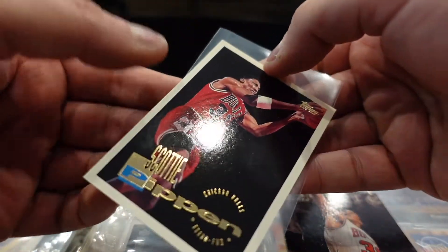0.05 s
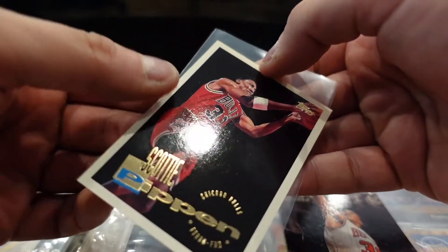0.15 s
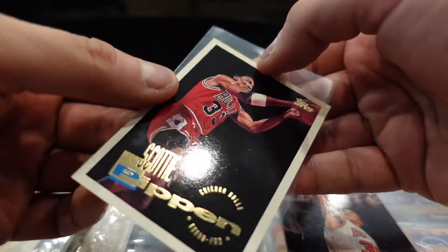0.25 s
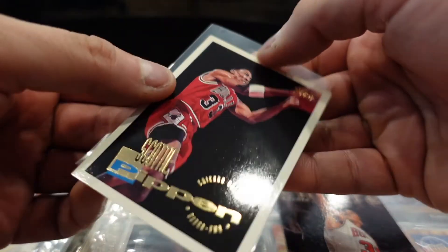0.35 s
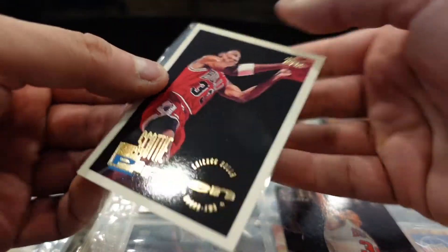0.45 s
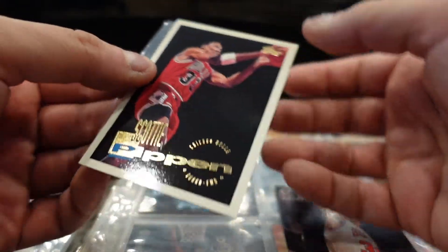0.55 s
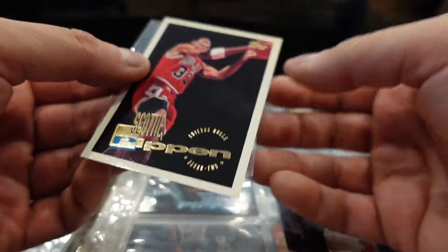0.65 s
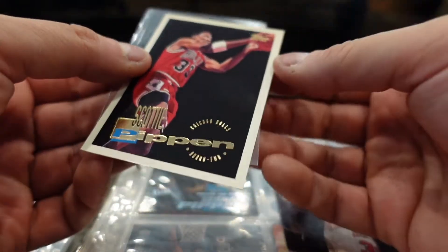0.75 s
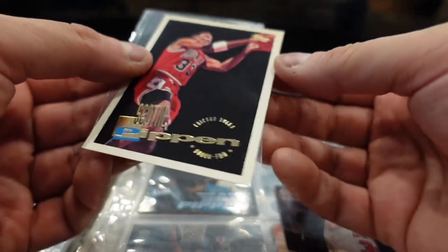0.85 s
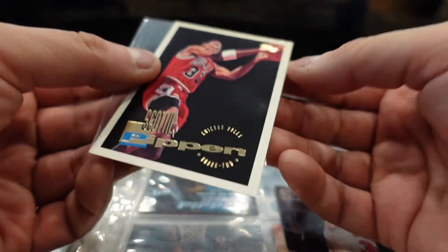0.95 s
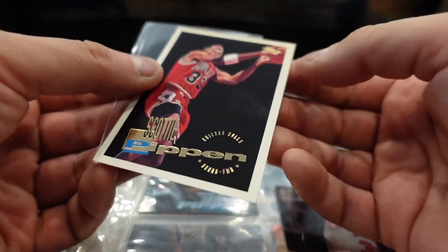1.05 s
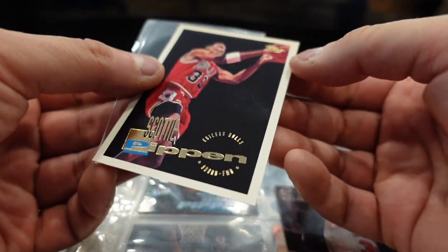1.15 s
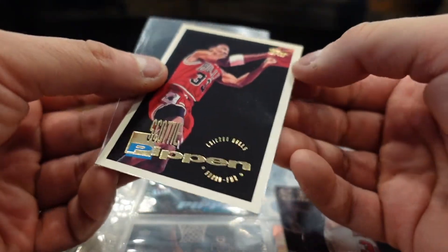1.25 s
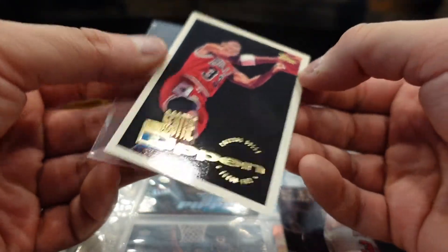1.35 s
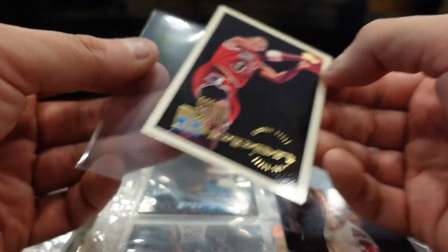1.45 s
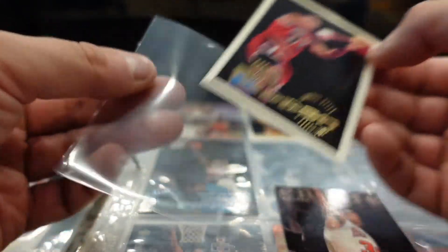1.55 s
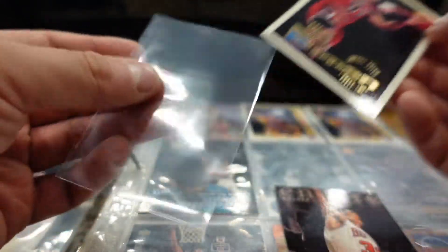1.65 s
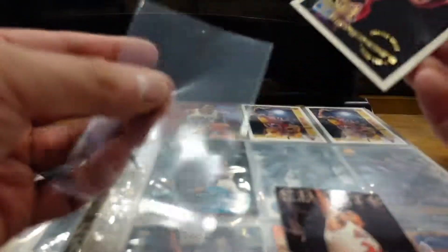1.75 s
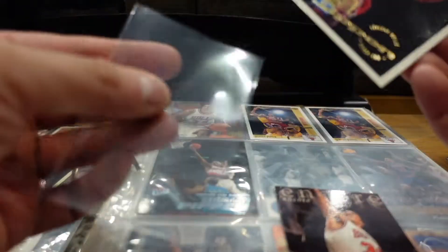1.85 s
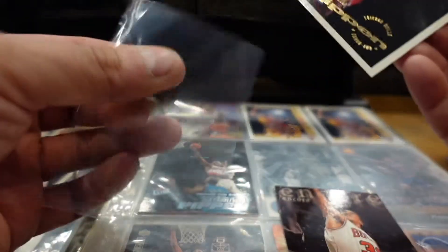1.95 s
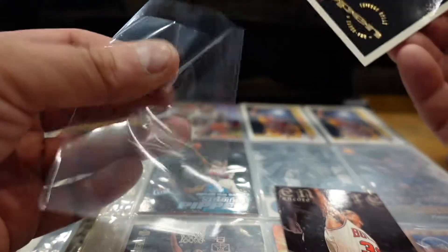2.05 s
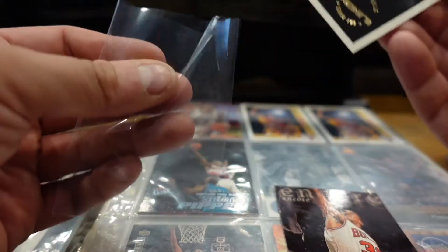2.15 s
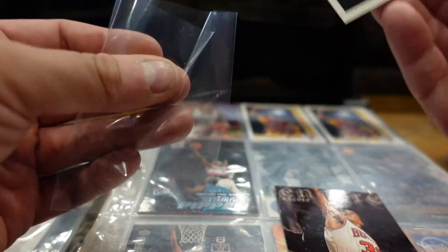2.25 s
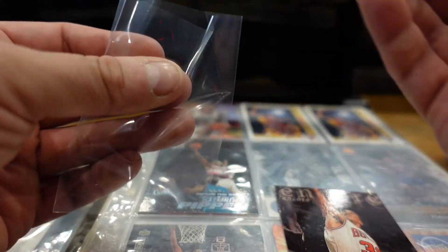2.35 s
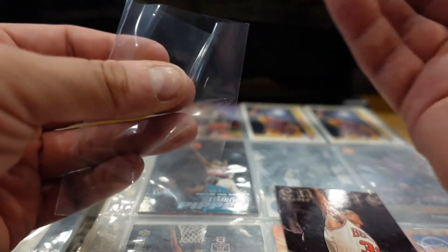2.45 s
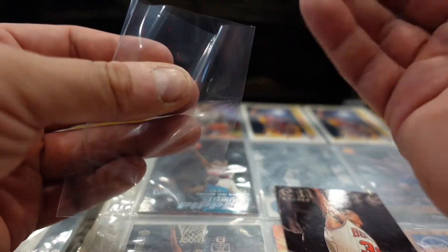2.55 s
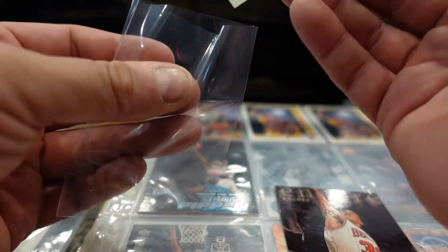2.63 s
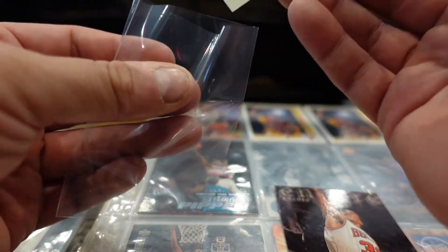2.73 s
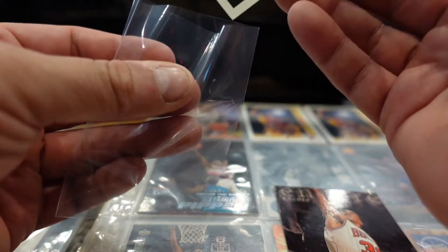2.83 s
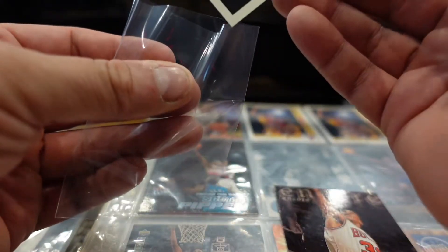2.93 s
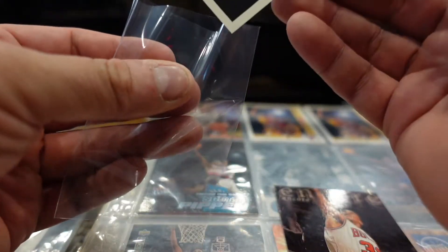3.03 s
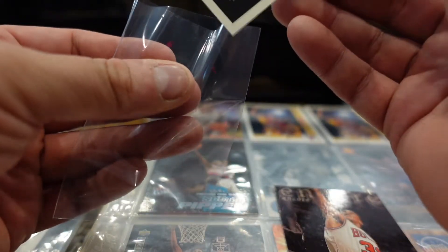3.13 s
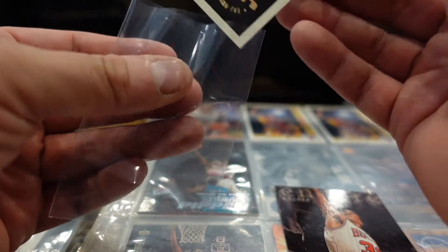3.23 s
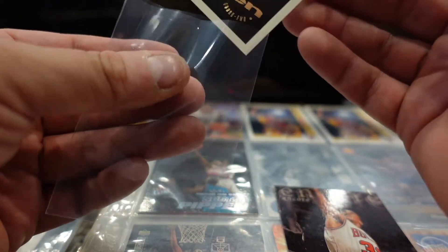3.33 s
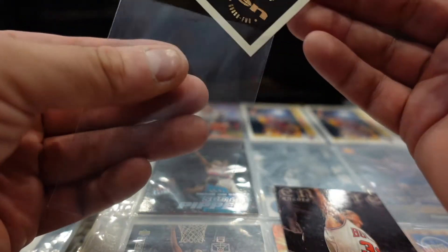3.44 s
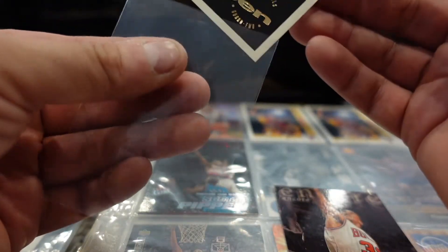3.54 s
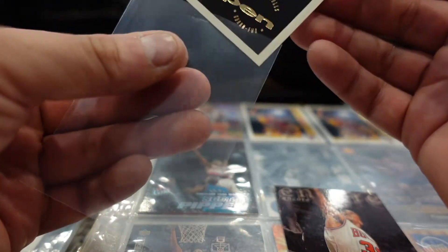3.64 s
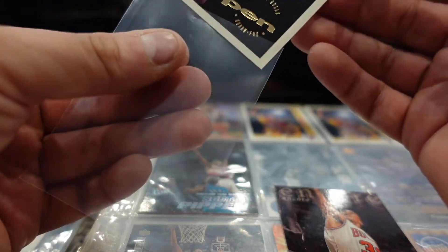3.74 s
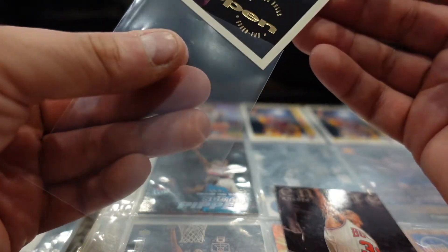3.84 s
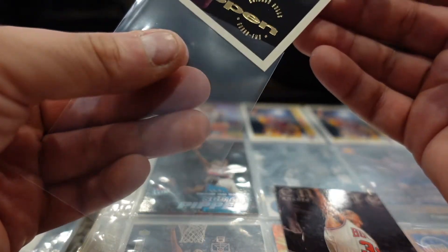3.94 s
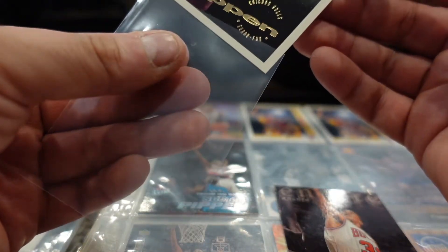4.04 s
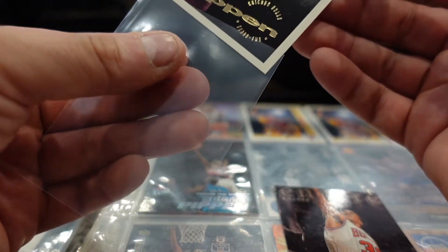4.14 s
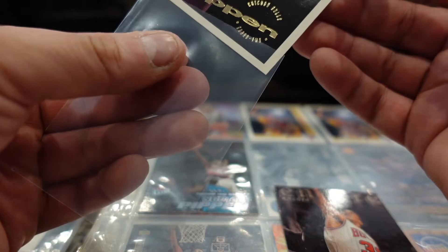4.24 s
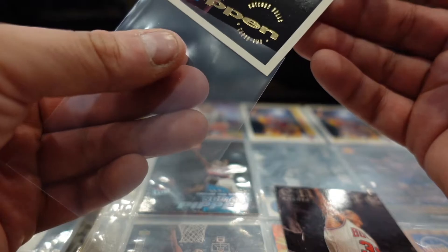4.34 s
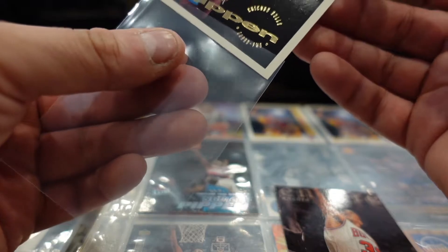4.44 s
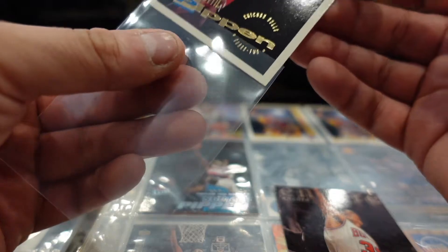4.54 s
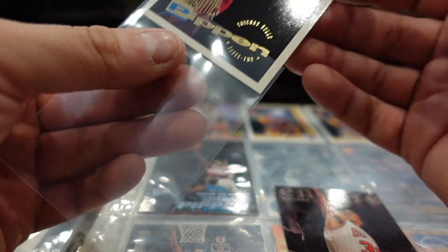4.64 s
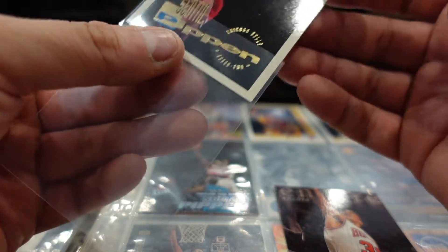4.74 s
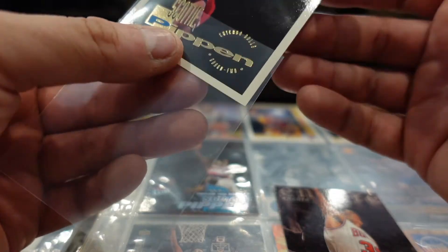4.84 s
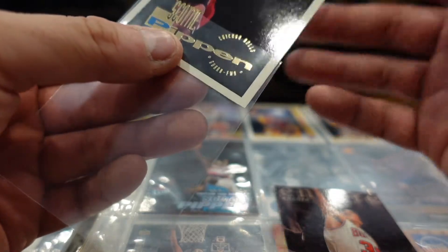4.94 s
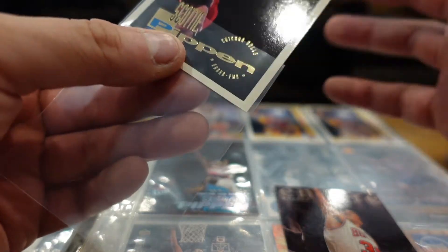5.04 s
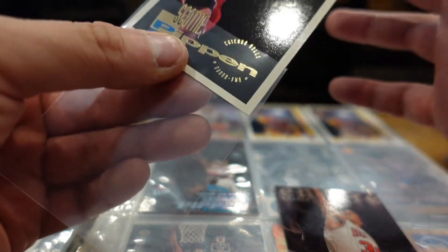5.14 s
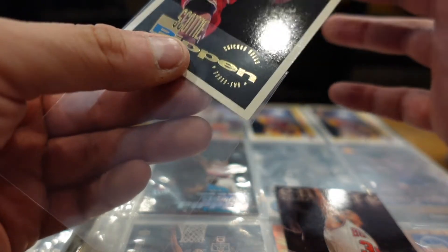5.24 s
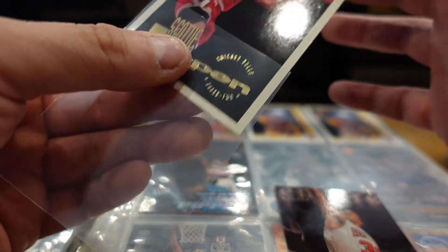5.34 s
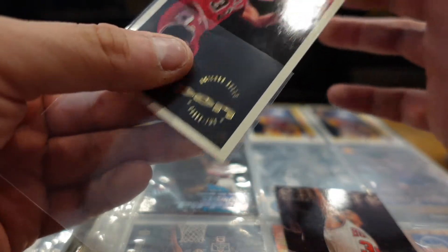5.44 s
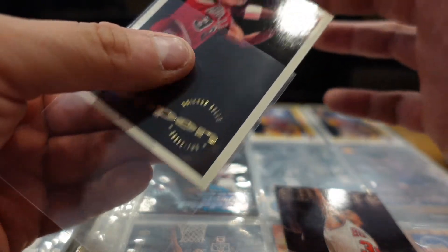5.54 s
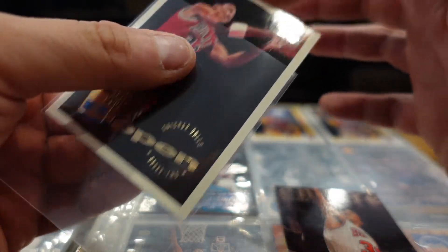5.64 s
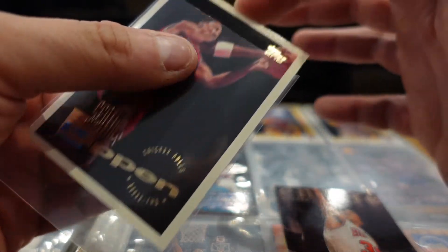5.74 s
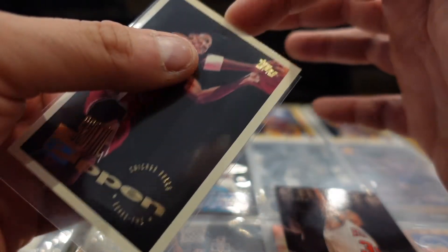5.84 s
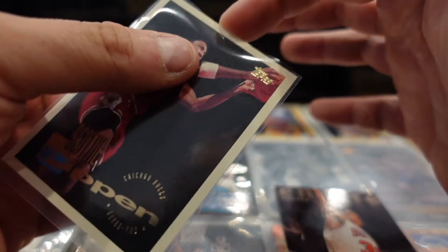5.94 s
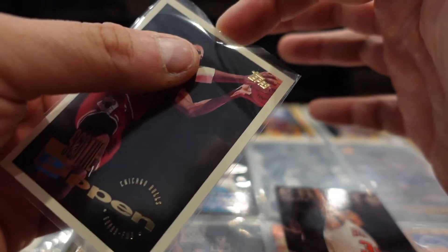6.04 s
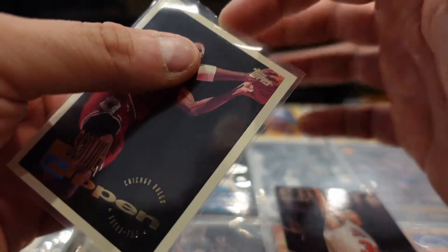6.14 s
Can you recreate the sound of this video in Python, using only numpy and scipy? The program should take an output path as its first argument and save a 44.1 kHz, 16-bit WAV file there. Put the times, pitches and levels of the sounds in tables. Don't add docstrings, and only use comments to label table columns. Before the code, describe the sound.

A quiet room with soft, low, slowly swelling ventilation noise, faint airy duct whistles at the start and around 1 s, and a thin steady electric whine near 2.8 kHz, fading around 2.4 s and returning from 3.5 to 5.4 s. Close to the microphone, slightly left, fingers make tiny ticks and faint creases at 0.4-1.4 s. From 1.6 s, dull crinkles and soft knocks build into sharp, bright plastic snaps at 1.9-2.2 s, loudest near 2.15. A lull follows with sparse ticks. At 3.0-3.3 s the film peels open in a hollow, crackly run, strongest at 3.16, trailing off by 3.7. Near quiet until 4.5, then very faint rubbing with thin squeaky film tones grows through 5.7. At 5.8-6.1 s the card scrapes into the tight pocket with a steady, pitched hiss, slightly darkening, and seats with a crisp snap at 6.15.

```python
import sys
import numpy as np
from scipy import signal
from scipy.fft import rfft, irfft, next_fast_len
from scipy.io import wavfile
from scipy.ndimage import uniform_filter1d

SR = 44100
rng = np.random.default_rng(int(sys.argv[2]) if len(sys.argv) > 2 else 0)


def gain_from_decibels(decibels):
    exponent = np.asarray(decibels, float) / 20
    return 10 ** exponent


def unload_audio(sound):
    columns = np.transpose(np.atleast_2d(sound))
    steps = np.round(np.clip(columns, -1, 1) * 32767)
    wavfile.write(sys.argv[1], SR, steps.astype(np.int16))


N = 272626
T = np.arange(N) / SR
SIZE = next_fast_len(N)
F = np.maximum(np.arange(SIZE // 2 + 1) * SR / SIZE, 1)

# (frequency [Hz], level per Hz [dB])
FILM_SPECTRUM = [(900, -36.5), (1900, -8.5), (2300, -5), (3150, -1.5), (3800, 1), (4900, -1), (6300, -1.5),
                 (9300, -8), (10400, -10), (14600, -16.5), (16000, -29.5)]


def unit(x):
    return x / np.sqrt(np.mean(x ** 2) + 1e-30)


def over_f(table):
    hz, value = np.transpose(table)
    return np.interp(np.log(F), np.log(hz), value)


def ring(x, hz, width_hz):
    return signal.lfilter(*signal.iirpeak(min(hz, .44 * SR), hz / width_hz, fs=SR), x)


def grains(size, share, spread_db):
    hit, sign, big = rng.random((3, size))
    return unit((hit < share) * np.sign(sign - .5) * gain_from_decibels(-spread_db * np.log(big + 1e-9)))


def walk(rate_hz, size=N):
    k = int(SR / rate_hz)
    held = np.repeat(rng.standard_normal(size // k + 1), k)
    return 1.344 * uniform_filter1d(uniform_filter1d(held, k), k)[:size]


def add(out, start_s, burst):
    i = int(start_s * SR)
    part = out[i:i + len(burst)]
    part += burst[:len(part)]


def drifting(x, hz, width_hz, drift):
    turn = np.exp(2j * np.pi * np.cumsum(hz * (1 + drift * walk(12, size=len(x)))) / SR)
    p, q = np.exp(-np.pi * width_hz * np.array([1, 3]) / SR)
    return unit((signal.lfilter([1], np.poly([p, q]), x / turn) * turn).real)


def modes(x, table, rate_hz, wander_db, lean_db=0):
    total = 0
    for hz, width_hz, db in table:
        level_db = db + wander_db * walk(rate_hz) + lean_db * np.log2(4500 / hz)
        total = total + gain_from_decibels(level_db) * drifting(x, hz, width_hz, drift=.005)
    return unit(total)


def folds(rows, upper_hz=6427, hz_per_db=258.5):
    out = []
    for s, db, hz, tight_db, ms in rows:
        high_hz = np.clip(upper_hz + hz_per_db * tight_db, 5600, 8400)
        out.append((s, db, hz, db + tight_db, high_hz, ms / 1000))
    return out


def buckle(rows, share, fade, first, ringing, thud, air, gain_db):
    out, t = np.zeros(N), T[:3072]
    highs = signal.butter(3, [4300, 8600], "band", fs=SR, output="sos")
    sheet = signal.butter(2, [200, 1150], "band", fs=SR, output="sos")
    top = signal.butter(2, [8600, 13500], "band", fs=SR, output="sos")
    for s, low_db, low_hz, high_db, high_hz, length_s in rows:
        shape = np.exp(-(t / max(length_s, 3e-4)) ** fade)
        big = grains(len(t), share, 2.83) * shape
        small = grains(len(t), share, 0.83) * shape
        big[0], small[0] = first, -first
        edge_hz = max(np.clip(4800 + 80 * (high_db - low_db + 5.5), 3400, 4800), 1.3 * low_hz)
        lows = signal.butter(3, [0.6 * low_hz, edge_hz], "band", fs=SR, output="sos")
        low = signal.sosfilt(lows, big + ringing * ring(big, low_hz, 0.072 * low_hz))
        low = unit(low) - thud * unit(signal.sosfilt(sheet, big))
        high = signal.sosfilt(highs, small + ringing * ring(small, high_hz, 0.32 * high_hz))
        brightness = air * (high_hz / 7500) ** 5
        high = unit(high) - brightness * unit(signal.sosfilt(top, small))
        both = gain_from_decibels(low_db) * low + gain_from_decibels(high_db) * high
        add(out, s, both * gain_from_decibels(gain_db) / np.sqrt(len(t)))
    return out


def hollow(x, echo):
    lag = int(round(.68 * SR / 1000))
    return signal.lfilter([np.sqrt(1 - echo ** 2)], np.r_[1, np.zeros(lag - 1), -echo], x)


def snaps():
    # (time [s], energy [dB], ring [Hz], tightness [dB], length [ms])
    cracks = [(1.8956, -17, 1580, -36, 1.6), (1.8958, -19, 2900, -15, .4), (2.0785, -25, 3560, -2, 2.7),
              (1.9834, -16.5, 1630, -6, 1.5), (1.9864, -13.5, 3000, -2.5, 2.3),
              (1.9956, -19, 3540, -9, 1.5), (2.0968, -15.5, 3930, -12, 2.0), (2.1092, -16.5, 1540, 9, 1.8),
              (2.1261, -8.5, 2210, 5, 1.5), (2.1349, -6, 4080, -2, 1.1), (2.1478, -15, 3300, -4, 1),
              (2.1491, -5.5, 3593, -2, 1.2), (2.1512, -13, 3000, -2, 1.5), (2.1284, -18.5, 2600, 1.5, 2),
              (2.1115, -19.5, 1600, 3, 1.5), (2.1666, -10, 2160, -7, 2.7)]
    # (time [s], energy [dB], ring [Hz], tightness [dB])
    ticks = [(0.5755, -40.5, 1860, -2.5), (0.7065, -35, 3000, -1.5), (1.071, -36, 2700, -22),
             (1.5644, -34, 1180, -11), (1.6426, -40.5, 2830, 7.5), (1.657, -33, 1580, -17),
             (1.6826, -37, 1320, -6), (1.758, -36, 1700, -23), (1.7676, -29.5, 1920, -36),
             (1.884, -44, 1400, 1), (2.1, -26, 4040, 3), (2.314, -38.5, 4460, -7),
             (2.4553, -33.5, 2900, -3.5), (3.1517, -48, 2776, 2.5), (3.3612, -35, 2190, 1.5),
             (3.4547, -31, 2983, -5.5), (4.1979, -50.5, 2803, 3), (6.0137, -40.5, 1970, 7),
             (6.0227, -32.5, 2800, -5), (6.031, -37, 1488, -12), (6.0454, -32, 4300, -1),
             (6.0744, -41, 1811, -8), (5.957, -42, 3900, 5), (2.35, -36, 1293, -15),
             (3.407, -50.5, 2808, 9.5), (3.346, -44, 2800, 3)]
    tick_ms = 1.33
    rows = folds(cracks + [(*tick, tick_ms) for tick in ticks])
    x = buckle(rows, share=.3, fade=0.93, first=5.5, ringing=2.2, thud=0.26, air=0.31, gain_db=1.0)
    return np.where(T < 2.05, hollow(x, 0.15), x)


def peeling():
    # (time [s], energy [dB], ring [Hz], tightness [dB], length [ms])
    peel = [(2.964, -31.5, 2913, -9, 26), (2.984, -37, 1614, -8, 11.13), (3.0015, -25, 2900, -8, 9.7),
            (3.0245, -24, 1630, -3, 5.8), (3.0315, -17, 3100, -8, 7.4), (3.04, -28.5, 1340, -20, 7.2),
            (3.05, -27.5, 2890, -11, 2.6), (3.16, -12, 4012, -9.5, 9.7), (3.167, -18.5, 4350, 2, 8.405),
            (3.18, -23, 3220, -6.5, 5.1), (3.191, -19, 1550, -4.5, 21), (3.209, -28, 1390, -3, 8.5),
            (3.225, -22, 1720, -8, 5.986), (3.232, -18, 3940, -6, 3.5), (3.238, -18, 3700, -15, 2.9),
            (3.2412, -23, 2260, 1.5, .5), (3.244, -20.5, 1636, -7.5, 8.6), (3.255, -23.5, 1160, 0.5, 9.1),
            (3.263, -21, 1680, -2.5, 13), (3.274, -28.5, 1550, 0.5, 12)]
    rows = folds(peel, upper_hz=5740, hz_per_db=0)
    x = buckle(rows, share=0.42, fade=2.8, first=4.1, ringing=1.6, thud=0.52, air=0.58, gain_db=1.13)
    return hollow(x, .4)


def creasing():
    # (time [s], energy [dB], ring [Hz], tightness [dB], length [ms])
    creases = [
        (0.385, -29.5, 1780, -3, 37),
        (0.713, -33, 2911, 0.5, 10),
        (0.92, -36.5, 1650, -6, 49),
        (1.36, -37, 1290, -1.4, 34),
        (1.575, -31.5, 1672, -2, 45),
        (1.645, -31, 1210, -3, 14),
        (1.668, -38.5, 1210, 3, 28.64),
        (4.632, -42.5, 2400, 2.5, 23),
        (5.205, -43, 1500, -3, 8),
    ]
    return buckle(folds(creases), share=0.33, fade=2.8, first=2.6, ringing=0.29, thud=0.29, air=0.71,
                  gain_db=0.0)


def seating():
    # (time [s], energy [dB], ring [Hz], tightness [dB], length [ms])
    seat = [
        (6.132, -24, 1740, 2.062, 12),
        (6.1398, -31, 4144, 2.9, 1.755),
        (6.1441, -23, 4151, 4.5, 2.4),
        (6.1497, -11, 3970, 3.5, 0.29),
    ]
    return buckle(folds(seat), share=0.45, fade=0.76, first=5.4, ringing=2.4, thud=0.085, air=0.086,
                  gain_db=0.6)


def knocks():
    # (time [s], peak [dB], ring [Hz], t60 [s])
    knock_rows = [(0.37, -41, 550, 0.0413), (0.498, -47, 447, 0.021), (1.655, -38, 877, 0.01107),
                  (1.686, -41, 670, 0.036), (1.727, -48, 600, 0.044), (1.852, -48, 553, 0.059),
                  (3.263, -34, 995, 0.02264), (1.698, -40, 514, 0.035), (1.754, -37, 598, 0.086),
                  (1.768, -42, 530, 0.13), (1.801, -38.5, 590, 0.077), (1.982, -34, 386, 0.021),
                  (1.995, -35, 490, 0.091), (2.132, -48, 373, 0.048), (2.149, -33, 277, 0.031),
                  (2.167, -37.5, 289, 0.047), (3.053, -44.5, 255, 0.035), (3.164, -41, 248.1, 0.049),
                  (3.343, -44, 268, 0.041), (3.24, -38.5, 300, 0.044), (3.29, -40.5, 322, 0.0337),
                  (3.46, -44.5, 306, .05), (1.94, -44.5, 565, .05), (1.894, -41.5, 1630, 0.023),
                  (1.983, -34, 1590, .03), (2.108, -34.5, 1590, 0.026), (2.147, -31, 1580, .03),
                  (3.024, -45.5, 1560, .05), (3.163, -37, 1550, 0.054), (3.2, -44.5, 1540, .04),
                  (1.765, -45.5, 1730, .02), (2.454, -48, 1200, 0.014), (3.454, -47.5, 1186, .015),
                  (6.148, -36, 1250, 0.01), (3.574, -43.5, 529.3, 0.043), (3.956, -48, 557, 0.065),
                  (4.084, -49.5, 581, 0.088)]
    out, t = np.zeros(N), T[:8192]
    for s, db, hz, t60_s in knock_rows:
        push = rng.standard_normal(len(t)) * t * np.exp(-t / .003)
        body = ring(push, hz, np.log(1000) / (np.pi * max(t60_s, .01)))
        thump = ring(ring(push, hz, .8 * hz), hz, .8 * hz)
        body = unit(body) + .45 * unit(thump)
        add(out, s, body * gain_from_decibels(db - 4.0) / np.max(np.abs(body)))
    return out


def rubbing():
    # (start [s], peak [s], end [s], level [dB], treble over the level [dB])
    strokes = [(1.66, 1.72, 2.06, -73, -5), (1.887, 2.003, 1.98, -50.5, 1), (1.957, 2.01, 2.12, -52.5, -5),
               (2.07, 2.084, 2.1548, -47.5, -3), (2.113, 2.175, 2.31, -58, -3.5),
               (2.12, 2.22, 3, -69.5, -6), (3.265, 3.289, 3.45, -60.5, -6), (3.293, 3.424, 3.73, -69.5, 0),
               (4.42, 4.773, 4.91, -66.5, -4), (4.702, 4.963, 5.32, -64, -22), (5.1, 5.47, 6.02, -60, -3.5),
               (5.296, 5.617, 5.7, -71, -3), (5.498, 5.733, 6.16, -60.5, -5)]
    # (frequency [Hz], width [Hz], level [dB])
    film_modes = [(2670, 120, -5), (3950, 150, 0), (4450, 200, 0), (5070, 120, -6), (5630, 130, -1),
                  (6230, 120, -5)]
    fade_db, roundness, treble_hz = 29, 1.76, 7340
    grit = rfft(grains(N, .3, 2.24) * gain_from_decibels(1.23 * walk(45)), SIZE) * gain_from_decibels(over_f(FILM_SPECTRUM))
    low = 1 / (1 + (F / treble_hz) ** 8)
    body = unit(irfft(grit * low, SIZE)[:N])
    treble = unit(irfft(grit * (1 - low), SIZE)[:N])
    pitches = modes(grains(N, .3, 2.2), film_modes, rate_hz=7.0, wander_db=2.5)
    out = np.zeros(N)
    for start, peak, end, db, treble_db in strokes:
        away = np.abs(np.interp(T, [start - 1, start, peak, end, end + .1], [-9, -1, 0, 1, 9]))
        slow = np.clip((-treble_db - 5.0) / 30.0, .04, .2)
        film = gain_from_decibels(0.16) * (np.sqrt(1 - slow) * body + np.sqrt(slow) * pitches)
        out += gain_from_decibels(db - fade_db * away ** roundness) * (film + gain_from_decibels(treble_db - 2.0) * treble)
    return out


def patches():
    # (start [s], end [s], frequency [Hz], width [Hz], level [dB])
    patch_rows = [(1.928, 1.983, 7500, 700, -54.5), (1.94, 1.987, 6200, 500, -56),
                  (1.94, 1.981, 3700, 630, -53), (1.995, 2.039, 3500, 370, -46.5),
                  (2.003, 2.041, 4400, 360, -50), (4.5, 4.801, 6780, 200, -76.5),
                  (4.62, 4.951, 6200, 190, -74), (4.639, 4.78, 5330, 200, -70),
                  (4.62, 4.821, 6900, 330, -76), (4.747, 4.858, 3976, 200, -81.5),
                  (4.843, 5.099, 2400, 200, -72), (4.841, 5.121, 4300, 240, -68.5),
                  (4.86, 5.1, 5070, 260, -69), (4.863, 5.243, 5640, 200, -72.5),
                  (4.9, 5.151, 4400, 120, -83), (4.98, 5.33, 3930, 220, -74), (1.74, 1.83, 450, 200, -60),
                  (1.93, 2.025, 640, 250, -56.5), (1.66, 1.72, 570, 250, -64),
                  (5.27, 5.42, 5000, 900, -67.5), (5.05, 5.3, 5200, 900, -74), (5.26, 5.56, 3920, 280, -68),
                  (5.3, 5.55, 3600, 220, -69), (5.329, 5.598, 5800, 300, -73), (5.3, 5.5, 6900, 360, -74),
                  (5.349, 5.55, 5900, 250, -68), (5.52, 5.679, 3700, 300, -62),
                  (5.555, 5.72, 4510, 220, -65), (5.598, 5.821, 3888, 200, -65),
                  (5.551, 5.799, 6400, 220, -71), (5.557, 5.8, 8100, 600, -67),
                  (5.421, 5.803, 2650, 360, -70), (5.795, 5.849, 5700, 305, -55),
                  (2.07, 2.11, 3700, 540, -48), (2.085, 2.11, 4350, 580, -52),
                  (2.075, 2.11, 14000, 820, -53.5)]
    out = np.zeros(N)
    for start, end, hz, width_hz, db in patch_rows:
        size = int((end - start) * SR)
        tone = drifting(grains(N // 8, .3, 2.1385), hz, width_hz, drift=.01)[:size]
        add(out, start, tone * np.hanning(size) ** .35 * gain_from_decibels(db + 1.1 * walk(25, size=size)))
    return out


def sliding():
    # (frequency [Hz], width [Hz], level [dB])
    pocket = [(270, 120, -7), (1860, 130, -2.5), (3630, 160, 0), (3980, 130, -4), (4620, 180, -5),
              (5140, 150, -1), (5680, 220, -6), (6700, 400, -3), (7600, 1200, -7)]
    start_s, attack_s, stop_s, level_db, fall_db_s = 5.795, 0.029, 6.105, -54, 142
    tilt_db_s, mid_s = 9, 5.98
    scrape = rfft(grains(N, 0.29, 3.7), SIZE) * gain_from_decibels(over_f(FILM_SPECTRUM))
    hiss = unit(irfft(scrape / (1 + (F / 9000) ** 4), SIZE)[:N])
    lean_db = tilt_db_s * np.clip(T - mid_s, -.16, .1)
    tone = modes(grains(N, .3, 2.083), pocket, rate_hz=14.0, wander_db=1.0, lean_db=lean_db)
    attack = np.clip((T - start_s) / attack_s, 0, 1)
    shape = attack * gain_from_decibels(level_db - fall_db_s * np.maximum(T - stop_s, 0))
    return (tone / np.std(tone[T > start_s]) + 0.68 * hiss) * shape


def fade_gate(on_s, off_s):
    return np.clip(np.minimum(T - on_s, off_s - T) / 0.11, 0, 1)


def ventilation():
    # (time [s], level [dB])
    swell = [(0.0, -59), (0.8, -61), (1.03, -58.5), (1.3, -62), (2.03, -57), (2.28, -58.5), (2.66, -66.5),
             (2.99, -63), (3.18, -57.5), (3.7, -62.5), (4.3, -63), (6.18, -63)]
    # (frequency [Hz], level per Hz [dB])
    spectrum = [(15, -47), (40, -35.5), (53, -18), (70, -8.5), (102, -8), (125, -2), (263, 0.5),
                (405, -3.5), (575, -2.5), (700, -6.5), (1150, -6.5), (2700, -18.5), (3500, -23.5),
                (13600, -35), (16000, -37)]
    # (frequency [Hz], left-right likeness [0-1])
    likeness = [(60, 0.97), (130, 0.9), (300, 0.5), (700, 0.022), (5000, .02), (9000, 0.22), (15000, 0.9)]
    s, hum_db = np.transpose(swell)
    like = np.clip(over_f(likeness), 0, 1)
    noise = rfft(rng.standard_normal((2, SIZE)))
    mid, side = noise * gain_from_decibels(over_f(spectrum)) * np.sqrt([1 + like, 1 - like])
    pair = np.array([mid + side, mid - side])
    low = 1 / (1 + (F / 4200) ** 4)
    hum = unit(irfft(pair * np.sqrt(low), SIZE)[:, :N])
    hiss = unit(irfft(pair * np.sqrt(1 - low), SIZE)[:, :N])
    return hum * gain_from_decibels(np.interp(T, s, hum_db) + 1.8 * walk(5.82)) + hiss * gain_from_decibels(-74)


def whines():
    # (on [s], off [s], frequency [Hz], level [dB], wobble [Hz])
    whine_rows = [
        (-.2, .7, 2832, -77, 12),
        (.58, 1.45, 2832, -70.5, 5),
        (1.35, 2.4, 2832, -72.5, 5),
        (3.55, 4.45, 2832, -73.5, 4),
        (4.35, 4.85, 2832, -76, 5),
        (4.75, 5.4, 2832, -79, 5),
    ]
    out = np.zeros((2, N))
    for on, off, hz, db, wobble_hz in whine_rows:
        phase = 2 * np.pi * np.cumsum(hz + wobble_hz * walk(40)) / SR
        out += np.sin([phase, phase + 1.2]) * fade_gate(on, off) * gain_from_decibels(db + 0.75 * walk(4.3))
    return out


def ducts():
    # (on [s], off [s], frequency [Hz], rms [dB], width [Hz])
    duct_rows = [
        (-.2, .6, 1770, -70, 110),
        (-.2, .58, 4000, -79, 80),
        (.82, 1.15, 834, -71, 50),
        (.9, 1.35, 1308, -72, 70),
        (.85, 1.1, 1663, -74, 60),
        (3.9, 4.02, 960, -70, 40),
    ]
    out = np.zeros((2, N))
    for on, off, hz, db, width_hz in duct_rows:
        noise = rng.standard_normal((2, N))
        tone, other = unit(ring(ring(noise, hz, width_hz), hz, 3 * width_hz))
        pair = np.array([.8 * tone + .6 * other, .8 * tone - .6 * other])
        out += pair * fade_gate(on, off) * gain_from_decibels(db)
    return out


def reflections(x):
    t = T[:SR // 3]
    decay = gain_from_decibels(-34.5) * np.exp(-t / 0.0021) + gain_from_decibels(-45.5) * np.exp(-t / 0.048)
    tail = rng.standard_normal((2, len(t))) * decay
    tail = signal.lfilter([.7], [1, -.3], tail + 0.2 * tail[::-1])
    return signal.fftconvolve(x[None], tail, axes=1)[:, :N]


def scene():
    close = snaps() + peeling() + creasing() + seating() + knocks()
    slide = rubbing() + patches() + sliding()
    side = np.array([[.5], [-.5]])
    left, right = close * gain_from_decibels(.7 * side) + slide * gain_from_decibels(2.7 * side)
    left = signal.lfilter([1.07, -.12], [1], left)
    right = signal.lfilter([.87, .1], [1], right)
    room = ventilation() + whines() + ducts()
    return np.array([left, right]) + reflections(close + slide) + room


def low_pass(x):
    return signal.sosfilt(signal.butter(12, 15800, fs=SR, output="sos"), x)


def record(dry):
    return low_pass(dry)


dry = scene()
out = record(dry)
unload_audio(out)
```